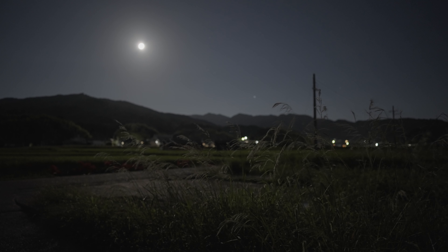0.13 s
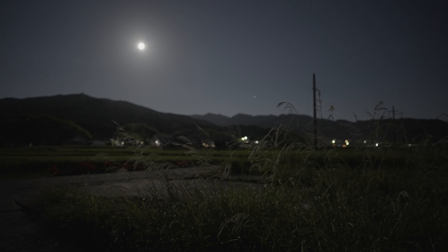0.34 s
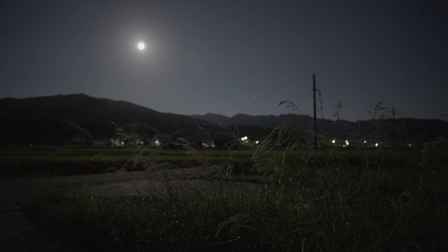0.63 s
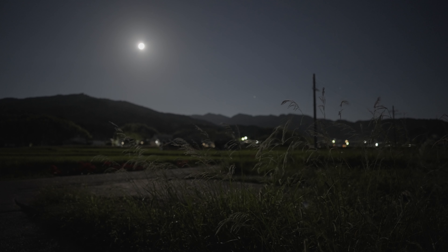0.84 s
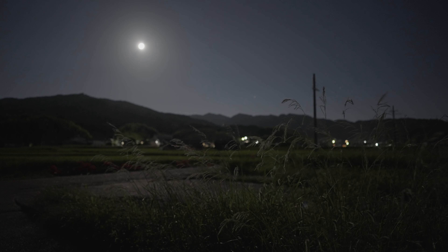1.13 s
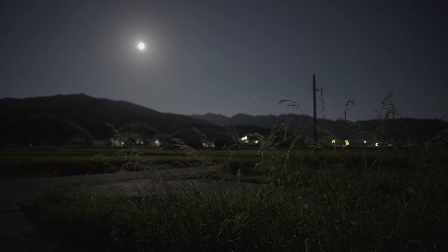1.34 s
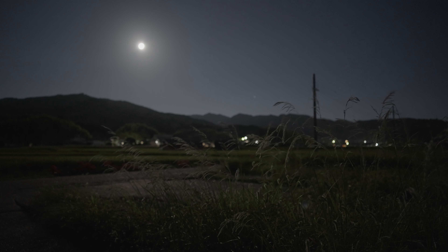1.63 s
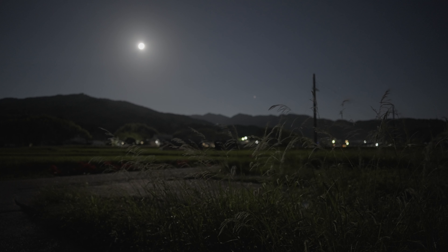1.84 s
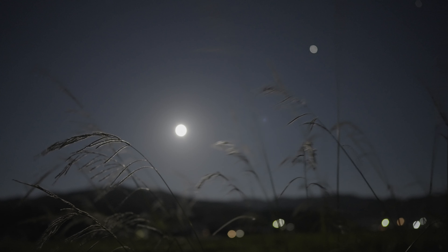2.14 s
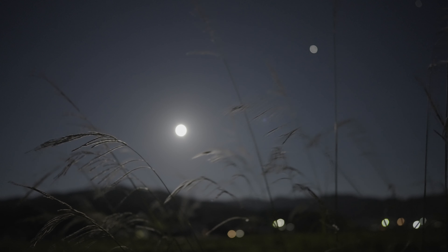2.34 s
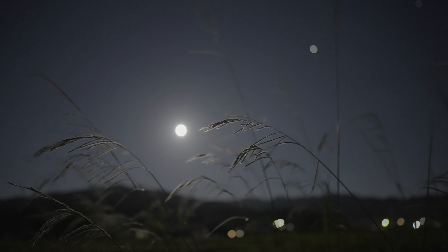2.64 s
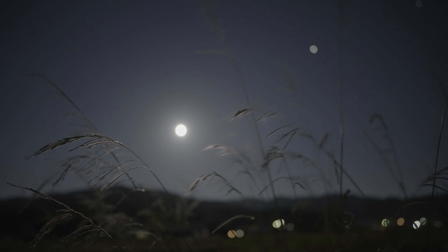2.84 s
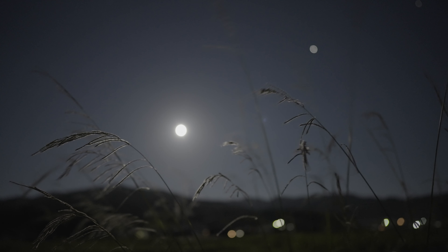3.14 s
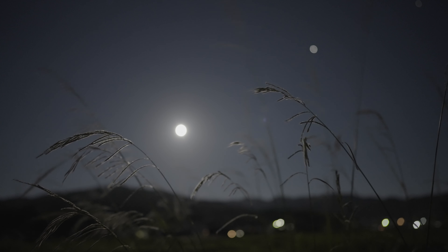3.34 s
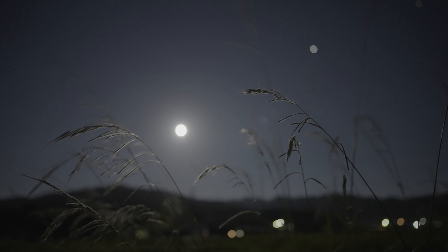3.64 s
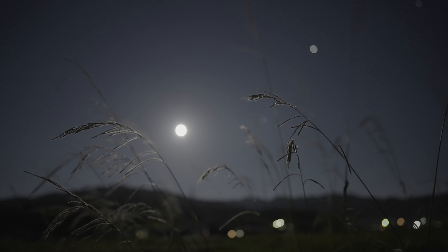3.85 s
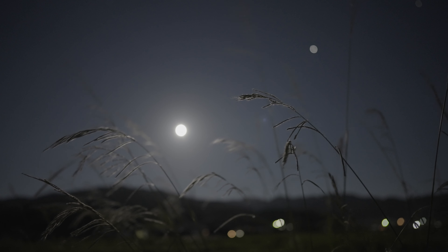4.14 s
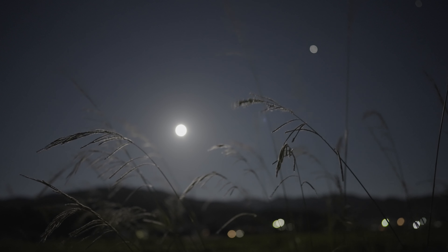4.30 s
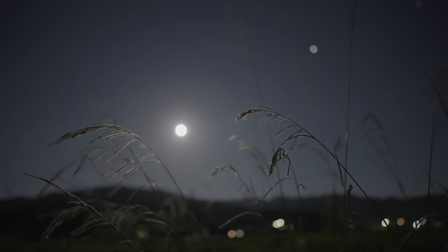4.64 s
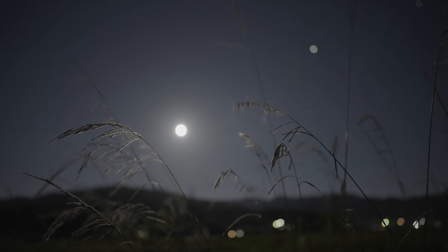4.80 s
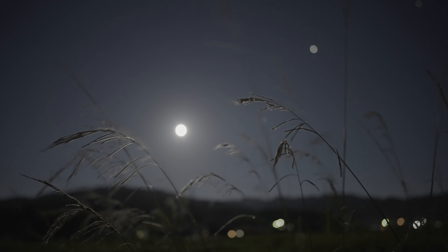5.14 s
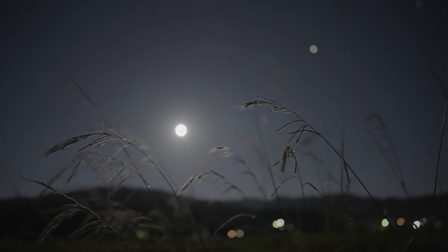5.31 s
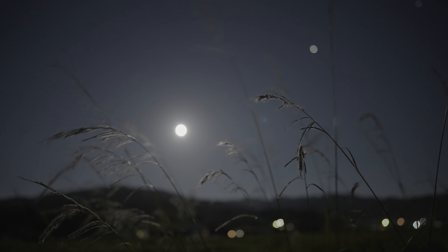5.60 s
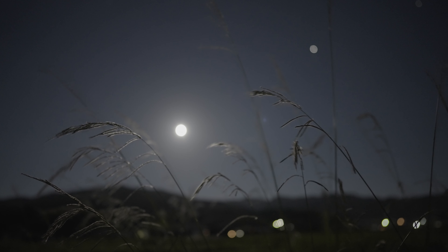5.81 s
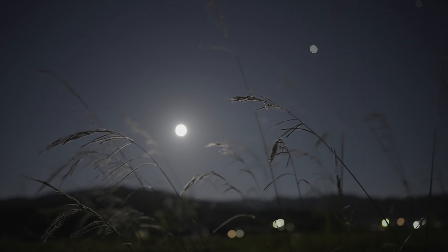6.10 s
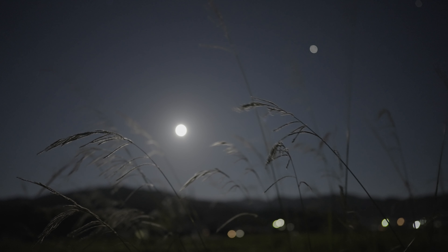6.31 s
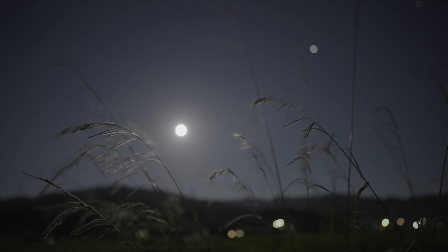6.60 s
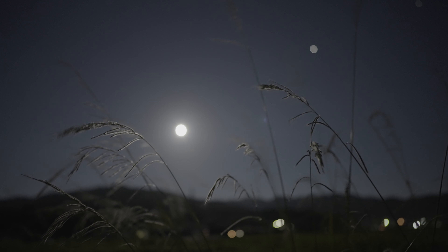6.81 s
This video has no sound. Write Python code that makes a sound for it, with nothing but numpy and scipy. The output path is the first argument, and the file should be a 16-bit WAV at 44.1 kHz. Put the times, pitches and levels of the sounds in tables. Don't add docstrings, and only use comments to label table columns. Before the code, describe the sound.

A dense autumn insect chorus at night: near crickets trill in overlapping bursts, others buzz high above, with soft water hiss, bubbles and light wind rumble.

```python
import sys
import numpy as np
from scipy import signal
from scipy.fft import rfft, irfft, next_fast_len
from scipy.io import wavfile
from scipy.ndimage import map_coordinates

SR = 44100
rng = np.random.default_rng(int(sys.argv[2]) if len(sys.argv) > 2 else 0)


def bounce(signal):
    frames = np.transpose(np.atleast_2d(signal))
    limited = np.clip(frames, -1, 1)
    pcm = np.round(limited * 32767).astype(np.int16)
    wavfile.write(sys.argv[1], SR, pcm)


def ratio(d):
    e = np.asarray(d, float) / 20
    return 10 ** e


N = 306936


def near_crickets():
    # start_s, gap_ms, strokes, pitch_hz, top_db
    slow_runs = [
        (0.106, 81, 9, 3840, -47),
        (1.423, 72.4, 5, 3790, -28.5),
        (2.664, 73.2, 5, 3764, -29.5),
        (5.285, 82, 4.72, 3904, -34.5),
    ]
    # start_s, gap_ms, strokes, pitch_hz, top_db
    quick_runs = [(0.612, 88, 3, 3590, -36), (0.862, 86, 4, 3615, -32), (1.826, 42, 4, 3680, -33),
                  (2.056, 47, 3, 3670, -33), (2.239, 52, 2, 3680, -33.5), (2.395, 44, 2, 3700, -33),
                  (2.558, 48, 2, 3645, -34), (3.056, 47, 4, 3690, -31), (3.259, 23, 2, 3640, -29.5),
                  (3.343, 46, 4, 3670, -31.5), (3.543, 42, 4, 3664, -37.5), (3.765, 41, 4, 3674, -34.5),
                  (4.332, 87, 5, 4230, -55), (5.813, 54, 4, 3793, -38)]
    # centre_s, pitch_hz, peak_db
    strays = [(0.7, 3560, -37), (2.68, 4100, -42), (5.693, 3930, -38), (5.77, 3860, -42),
              (1.375, 3810, -38), (1.469, 3895, -37.5), (1.656, 3780, -34), (1.801, 3900, -35),
              (1.985, 3820, -42), (2.065, 3710, -36), (2.352, 3800, -39), (2.913, 3500, -36),
              (2.997, 3610, -37), (4.055, 3670, -41), (4.222, 3645, -41), (4.391, 3570, -36),
              (4.444, 3690, -39), (4.51, 3980, -45), (4.9, 3685, -35), (4.965, 3820, -40),
              (5.116, 3600, -45), (5.248, 3695, -37), (6.112, 3800, -37), (6.268, 3695, -35),
              (6.397, 3760, -42), (6.696, 3670, -40), (6.781, 3650, -40), (6.942, 3705, -35)]
    groups = [(runs(slow_runs, swell_db=-16), 43), (runs(quick_runs, swell_db=-2.5), 27.4), (strays, 33)]
    s, hz, db = np.concatenate([rows for rows, _ in groups]).T
    stroke_ms = np.concatenate([np.full(len(rows), ms) for rows, ms in groups])
    overdrive_db = 3.5 * np.clip(db + 30.5, None, 0)
    octave_db = -27 + overdrive_db - 0.2 * np.clip(3735 - hz, 0, None)
    return chirps(s, hz, db, stroke_ms / 1000, 12.9 * stroke_ms, flat=1.1, octave_db=octave_db)


def deepest_cricket():
    # centre_s, peak_db
    pairs = [
        (0.036, -37),
        (0.186, -37),
        (0.343, -38),
        (0.503, -38.5),
        (2.708, -35),
        (2.815, -36.5),
        (3.011, -39),
        (3.139, -36),
        (3.27, -37.5),
        (3.411, -35.5),
    ]
    # centre_s, peak_db
    singles = [(0.675, -36.5), (0.792, -37.5), (2.943, -34.5), (3.554, -33.5), (3.649, -38), (3.742, -36.5),
               (3.847, -37), (3.944, -37), (4.058, -36.5), (4.194, -40), (4.331, -36.5)]
    pair_gap_s = 0.0495
    seconds = [(s + pair_gap_s, db) for s, db in pairs]
    s, db = np.transpose(pairs + seconds + singles)
    core = chirps(s, 3370, db, 0.02804, 236, flat=0.71)
    tail = chirps(s + 0.013, 3140, db - 13, 0.018, 330, flat=1.3) * ratio(2.5 * wobble(150))
    return core + tail


def phrase_cricket():
    # start_s, strokes_per_s, high_note_db
    phrases = [(2.685, 39, -42), (2.958, 49, -53), (3.226, 53, -49), (3.493, 67, -31.5),
               (3.769, 52.5, -37.5), (4.015, 46.6, -34), (4.291, 48, -35), (4.541, 44.6, -33),
               (4.822, 47.2, -32.5), (5.095, 44.5, -31), (5.38, 48.3, -31.5), (5.671, 51, -31.5),
               (5.953, 48, -32), (6.234, 49.4, -33), (6.517, 48.6, -32), (6.79, 48.3, -31.5)]
    low_note_db = -40.5
    start, rate, high_note_db = np.transpose(phrases)[:, :, None]
    k = np.arange(7)
    s = (start + k / rate).ravel()
    scatter = rng.standard_normal((len(s), 4))
    swell_db = -9 * np.exp(-k / 2.4)
    high_db = (high_note_db - 0.5 + swell_db).ravel() + 0.41 * scatter[:, 1]
    low_db = np.tile(low_note_db + 0.37 * swell_db, len(phrases)) + 0.71 * scatter[:, 3]
    high = chirps(s - 0.0055, 3665 + 15 * scatter[:, 0], high_db, 0.017, 286, flat=0.69)
    low = chirps(s, 3300 + 15 * scatter[:, 2], low_db, 0.0086, 170, flat=0.68)
    tail = chirps(s + 0.004, 2990, low_note_db - 16, 0.009, 300, flat=1.2)
    return high + low + tail


def grass_echo(x, t60):
    t = np.arange(SR // 5) / SR
    tail = rng.standard_normal(len(t)) * ratio(-60 * t / t60)
    return signal.fftconvolve(x, tail / np.linalg.norm(tail))[:N]


def ground_crickets():
    # time_s, pitch_hz, level_db
    warming = [
        (0, 7205, -63),
        (1.24, 7200, -62.5),
        (1.27, 6700, -90),
        (1.31, 6030, -67),
        (2.6, 6350, -69),
        (2.75, 6480, -61),
        (4.2, 6820, -63),
        (4.55, 7190, -65),
        (5.6, 7170, -63),
        (6.96, 7195, -63),
    ]
    hz, db = curves(warming)
    unsteady_hz = 28 + 0.25 * np.abs(7200 - hz)
    lower = trill(121, hz + unsteady_hz * wobble(90), db, sharp=2.6)
    upper = trill(106.5, 8830 + 110 * wobble(120), high_buzz_db(), sharp=5.8)
    return lower + upper


def high_buzz_db():
    # start_s, end_s
    bouts = [
        (0.03, 2.25),
        (2.38, 4.85),
        (5.02, 6.91),
    ]
    t = np.arange(N) / SR
    start, end = np.transpose(bouts)[:, :, None]
    edge_db_per_s, growth_db_per_s = 500, 0.4
    edges_db = edge_db_per_s * np.clip(np.minimum(t - start, end - t), None, 0)
    return np.max(-72 + growth_db_per_s * (t - start) + edges_db, axis=0)


def katydids():
    # time_s, level_db
    effort = [(0.0, -67), (0.73, -67.5), (1.12, -63.5), (1.22, -68), (1.43, -64.5), (2.52, -67),
              (3.25, -63.5), (4.38, -70), (4.63, -66), (4.73, -68.5), (5.89, -62), (6.18, -66.5),
              (6.4, -63.5), (6.57, -69.5), (6.78, -63.5), (6.96, -66)]
    # frequency_hz, density_db (per Hz)
    middle_rasp = [(9800, -32.5), (10900, -5), (11600, -2.5), (12300, -0.5), (12900, -12), (13600, -27)]
    upper_rasp = [(11800, -22), (12600, -2), (13300, 0), (14100, -3), (15700, -13)]
    narrow_rasp = [(9700, -25), (10100, -1.5), (10400, 0), (10900, -25)]
    effort_db, = curves(effort)
    effort_db = effort_db - np.mean(effort_db)
    middle = unit(beats(32.6, depth_db=2.0) * noise(middle_rasp))
    upper = unit(beats(33.4, depth_db=2.6) * noise(upper_rasp))
    narrow = unit(beats(33.2, depth_db=3.5) * noise(narrow_rasp))
    middle *= ratio(-70 + 0.5 * effort_db)
    upper *= ratio(-68.2 + 1.15 * effort_db)
    narrow *= ratio(-80.5 + effort_db + 2.5 * wobble(3))
    return middle + upper + narrow


def far_crowds():
    # time_s, swell_db
    swell = [
        (0, 0),
        (3.7, .5),
        (6.57, -0.5),
        (6.96, 1),
    ]
    swell_db, = curves(swell)
    low = crowd(count=550, hz=3703, spread_hz=155.8, length=0.03, fall_hz=340)
    middle = crowd(count=6000, hz=5142, spread_hz=145.0, length=0.012, fall_hz=179)
    high = crowd(count=900, hz=6265, spread_hz=324, length=0.0088, fall_hz=254)
    stragglers = crowd(count=40, hz=4084, spread_hz=85, length=0.022, fall_hz=297)
    crowds = ratio(-43) * low + ratio(-45.5) * middle + ratio(-60) * high
    return ratio(swell_db) * crowds + ratio(-62) * stragglers


def ditch():
    # frequency_hz, density_db (per Hz)
    water = [(150, -120), (200, -25.5), (300, -16.5), (480, -4), (800, -2.5), (1300, -1.5), (1700, -6),
             (2800, -5), (4400, 2), (8000, -9), (10000, -17), (15700, -33)]
    hiss = ratio(-55.0 + 0.77 * wobble(2.85)) * noise(water)
    fizz = ratio(-66.0 + 0.99 * wobble(7)) * bubble_fizz()
    return clear_bubbles() + fizz + hiss


def clear_bubbles():
    # start_s, pitch_hz, peak_db
    bubbles = [(0.071, 2000, -50), (0.349, 846, -53.5), (0.555, 1990, -44), (0.759, 805, -54.5),
               (0.97, 1030, -52.5), (0.986, 2100, -53), (1.093, 850, -55.5), (1.225, 2213, -49),
               (1.247, 2000, -51.5), (1.369, 1020, -53.5), (1.432, 1510, -57), (1.557, 1670, -55),
               (1.938, 980, -54), (2.276, 1410, -55), (2.499, 2350, -51.5), (3.227, 1660, -54),
               (3.303, 2230, -55), (3.523, 1550, -54), (4.026, 880, -50.5), (4.381, 2600, -44),
               (4.748, 2610, -48), (4.788, 930, -53), (4.888, 2050, -47.5), (4.939, 2120, -45.5),
               (5.097, 2100, -49.5), (6.266, 930, -49), (6.288, 2340, -47), (6.298, 1030, -51),
               (6.746, 1550, -52), (6.889, 878, -55)]
    s, hz, db = np.transpose(bubbles)
    ring_ms = 1000 * 22 / hz
    rise_hz = (0.1 + 0.02 * ring_ms * (hz < 1300)) * hz
    ringing = chirps(s + ring_ms / 6000, hz, db, 1.2 * ring_ms / 1000, -rise_hz, flat=1.6, lean=0.55)
    return ringing * ratio(1.2 * wobble(200))


def bubble_fizz():
    draw = rng.random((2200, 4))
    hz = 640 * 4.4 ** draw[:, 0]
    size_db = np.clip(-3.5 * np.log(draw[:, 1] + 1e-4), 0, 13)
    s = draw[:, 2] * N / SR
    cycles = 8 + 12 * draw[:, 3]
    return unit(chirps(s, hz, size_db, cycles / hz, -0.25 * hz, flat=1.2, lean=0.52))


def wind():
    # time_s, level_db
    breeze = [
        (0, -84),
        (1.05, -82),
        (1.16, -100.5),
        (1.5, -83),
        (2.4, -78.5),
        (2.8, -86.5),
        (5.6, -87.5),
        (6.96, -94),
    ]
    # peak_s, peak_db
    gusts = [
        (0.09, -79),
        (1.39, -70),
        (1.57, -74),
        (2.29, -79),
        (2.66, -88),
        (3.88, -84),
        (6.9, -80),
    ]
    # frequency_hz, density_db (per Hz)
    rumble = [(12, -46), (20, -6), (59, 1), (92, -2.5), (179, -10.5), (260, -13.5), (340, -43), (570, -120)]
    t = np.arange(N) / SR
    gust_db_per_s = 220
    gust_gain = sum(ratio(db - gust_db_per_s * np.abs(t - s)) for s, db in gusts)
    breeze_db, = curves(breeze)
    lumps = ratio(3.2 * wobble(13))
    return (ratio(breeze_db) + gust_gain) * unit(lumps * noise(rumble))


def runs(rows, swell_db):
    swell_strokes, scatter_hz, scatter_db = 0.72, 25, 0.73
    strokes = np.array([(s + k * gap_ms / 1000, hz, db + swell_db * np.exp(-k / swell_strokes))
                        for s, gap_ms, count, hz, db in rows
                        for k in range(round(count))])
    return strokes + rng.standard_normal(strokes.shape) * [0, scatter_hz, scatter_db]


def chirps(s, hz, db, length, fall_hz, flat, octave_db=-90, lean=1):
    values = (s, hz, db, length, fall_hz, octave_db)
    s, hz, db, length, fall_hz, octave_db = (np.broadcast_to(v, np.shape(s))[:, None] for v in values)
    k = np.arange(int(length.max() * SR))
    u = np.clip(k / SR / length, 0, 1)
    cycles = length * u * (hz + fall_hz * (0.354 - u ** 1.5 / 2.5))
    phase = 2 * np.pi * (cycles + rng.random(s.shape))
    octave = ratio(octave_db) * np.sin(np.pi * u ** 1.15) ** 2 * np.sin(2 * phase)
    tone = np.sin(phase) + octave
    envelope = np.abs(np.sin(np.pi * u ** lean)) ** flat
    at = np.clip(((s - length / 2) * SR).astype(int) + k, 0, N)
    return np.bincount(at.ravel(), (ratio(db) * envelope * tone).ravel(), N + 1)[:N]


def trill(rate, hz, db, sharp):
    stroke = np.pi * np.cumsum(rate * (1 + 0.0118 * wobble(8))) / SR
    tone = np.sin(2 * np.pi * np.cumsum(hz) / SR)
    uneven = ratio(0.93 * wobble(60) + 1.5 * np.sin(stroke))
    return ratio(db) * unit(uneven * np.abs(np.sin(stroke)) ** sharp * tone)


def beats(rate, depth_db):
    turn = 2 * np.pi * np.cumsum(rate * (1 + 0.035 * wobble(5))) / SR
    depth = depth_db * np.clip(1 + 0.48 * wobble(3.65), 0, 1.6)
    return ratio(depth * np.cos(turn) + 1.4 * wobble(14))


def crowd(count, hz, spread_hz, length, fall_hz):
    total = np.zeros(N)
    for step in np.linspace(-3.3, 3.3, 12):
        stroke = chirps(np.array([length]), hz + step * spread_hz, 0, length, fall_hz, flat=1.5)
        stroke = stroke[:int(2 * length * SR)]
        span = N + len(stroke)
        when = np.bincount(rng.integers(0, span, count), rng.choice([-1., 1.], count), span)
        total += np.exp(-step ** 2 / 4) * signal.oaconvolve(when, stroke, "valid")[:N]
    return unit(total)


def noise(spectrum):
    f, db = np.transpose(spectrum)
    m = next_fast_len(N)
    log_hz = np.log(np.fft.rfftfreq(m, 1 / SR) + 1)
    gain = ratio(np.interp(log_hz, np.log(f + 1), db, -120, -120))
    return unit(irfft(rfft(rng.standard_normal(m)) * gain, m)[:N])


def wobble(rate):
    knots = rng.standard_normal(int(N * rate / SR) + 4)
    return map_coordinates(knots, [np.arange(N) * rate / SR])


def curves(rows):
    s, *cols = np.transpose(rows)
    return [np.interp(np.arange(N) / SR, s, c) for c in cols]


def unit(x):
    return x / np.sqrt(np.mean(x ** 2) + 1e-20)


def scene():
    near = near_crickets() + deepest_cricket() + phrase_cricket()
    near = near * ratio(1.7 * wobble(170))
    grass = ratio(-13.5) * grass_echo(near, t60=0.14)
    insects = near + grass + ground_crickets() + katydids() + far_crowds()
    return (insects + ditch() + wind())[None]


def roll_off(x):
    return signal.sosfilt(signal.butter(12, 15680, fs=SR, output="sos"), x)


def record(dry):
    return roll_off(dry)


dry = scene()
out = record(dry)
bounce(out)
```